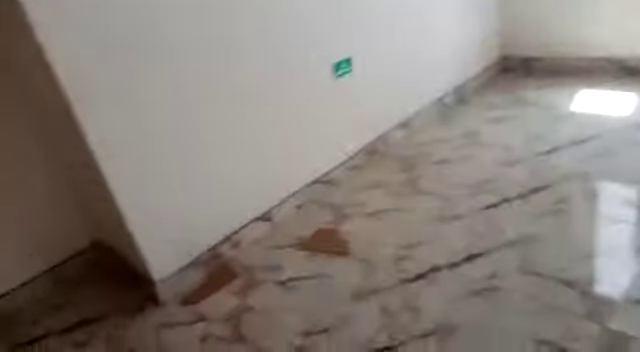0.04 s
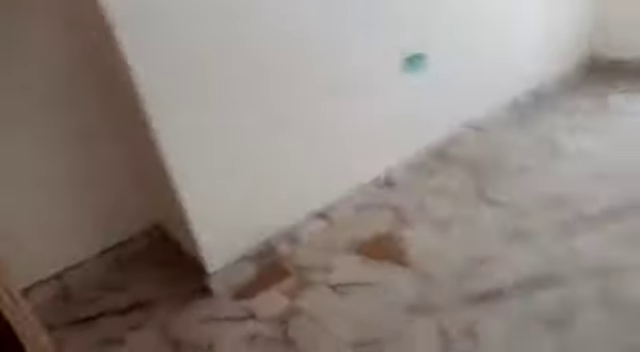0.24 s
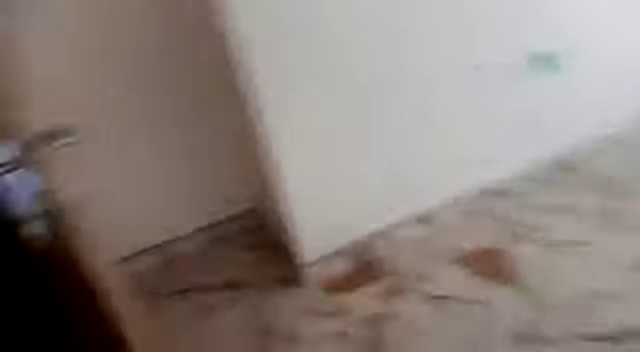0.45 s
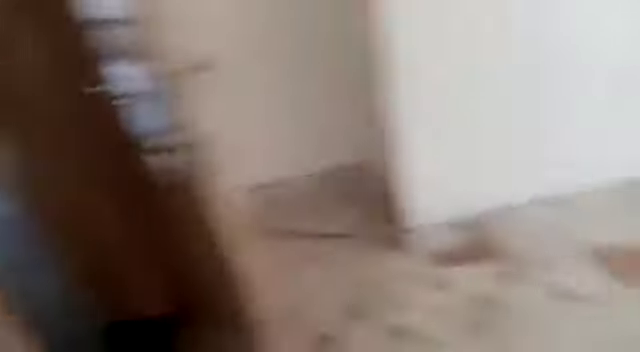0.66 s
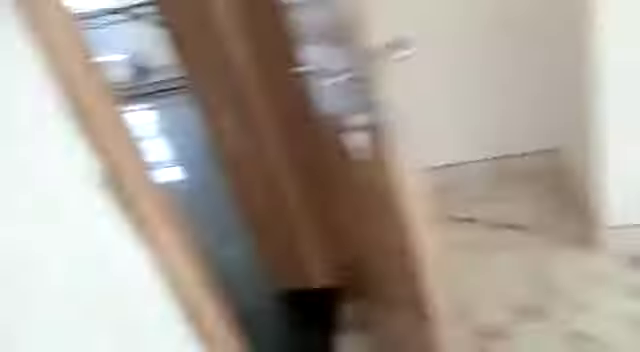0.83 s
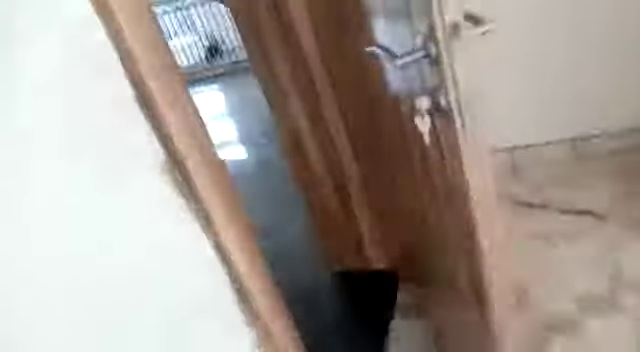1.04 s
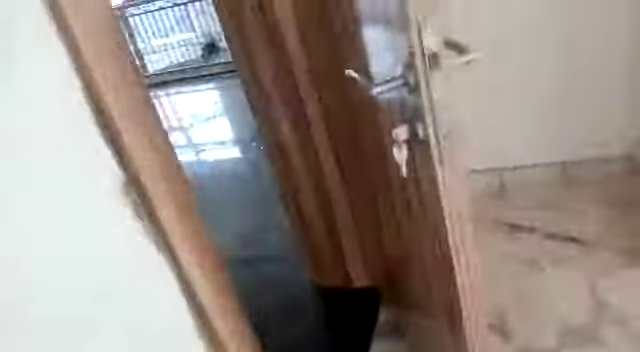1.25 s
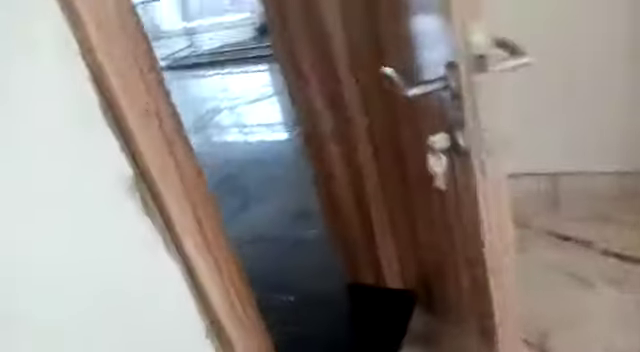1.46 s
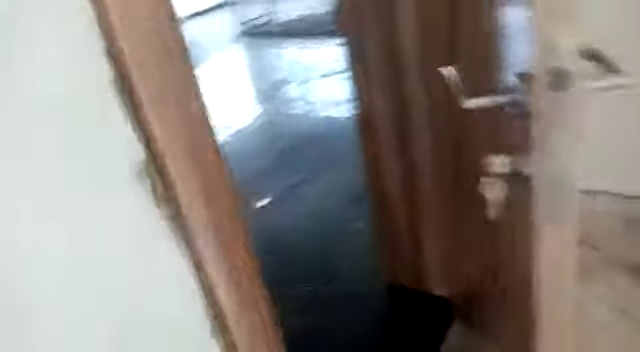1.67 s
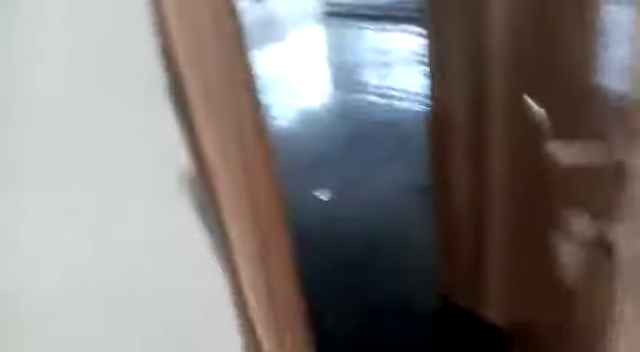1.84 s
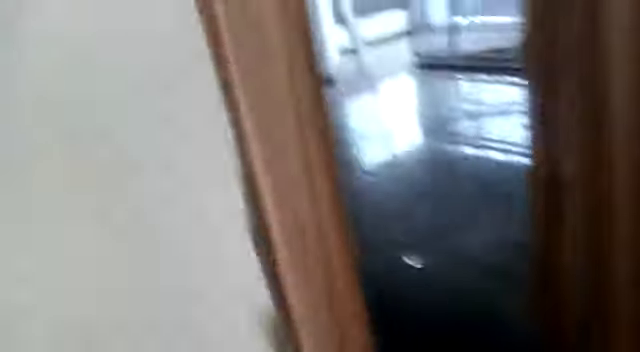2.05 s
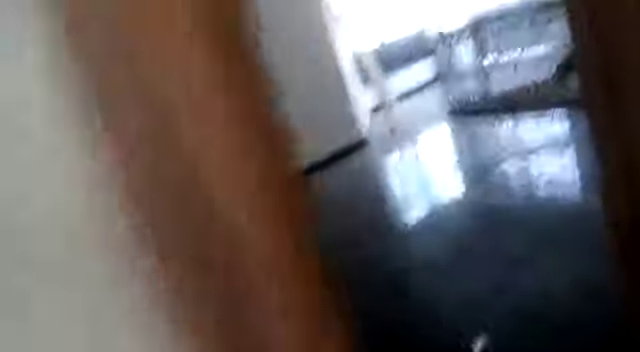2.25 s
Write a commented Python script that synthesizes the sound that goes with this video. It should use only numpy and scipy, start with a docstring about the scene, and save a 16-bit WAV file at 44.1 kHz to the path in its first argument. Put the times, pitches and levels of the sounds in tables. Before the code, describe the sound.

One loud bang from a wooden door forced open nearby fills an empty room with a long echo. Jingling keys, dull door knocks and clacks of the lock follow, then a single quiet footstep on the stone floor.

```python
"""Shoes shuffle softly, then a wooden door is forced open with a loud bang: a crack of air, the
ringing door leaf and the roar of a bare, stone-floored flat that echoes for seconds.
The door swings and thuds while a bunch of keys jingles in its lock.
Then the latch clacks as the handle is let go, and a footstep lands on the hard floor."""
import sys
import numpy as np
from scipy import signal
from scipy.io import wavfile
from scipy.ndimage import uniform_filter1d

SR = 44100
rng = np.random.default_rng(int(sys.argv[2]) if len(sys.argv) > 2 else 0)


def transcribe(signal):
    """Save signal, clipped to [-1, 1], as a 16-bit WAV file at the path in sys.argv[1]."""
    frames = np.atleast_2d(signal).T
    limited = np.clip(frames, -1, 1)
    pcm = np.round(limited * 32767).astype(np.int16)
    wavfile.write(sys.argv[1], SR, pcm)


N = 105840


def amp(db):
    """Decibels to gain."""
    return 10 ** (np.asarray(db) / 20)


def since(start_s):
    """Seconds since a moment, zero before it."""
    return np.maximum(np.arange(N) / SR - start_s, 0)


def curve(points):
    """Rows of (Hz, value) as a function of Hz, interpolated in log frequency."""
    points_hz, values = np.transpose(points)
    return lambda hz: np.interp(np.log(hz), np.log(points_hz), values)


def hump(centre_hz, half_width_oct, skirt_db=-48):
    """Bell-shaped spectrum, 3 dB down one half-width from its centre."""
    return lambda hz: np.maximum(-3 * (np.log2(hz / centre_hz) / half_width_oct) ** 2, skirt_db)


def noise_bands():
    """Narrow noise bands of unit rms: (centres in Hz, widths in Hz, signals)."""
    edges_hz = np.concatenate([np.geomspace(28, 7000, 25), np.arange(8000, 17001, 1000)])
    white = rng.standard_normal((3, 2 * N + SR // 4))
    bands = []
    for k in range(len(edges_hz) - 1):
        bandpass = signal.butter(3, edges_hz[k:k + 2], "band", fs=SR, output="sos")
        band = signal.sosfilt(bandpass, white[k % 3])[-2 * N:]
        bands.append(band / band.std())
    return np.sqrt(edges_hz[1:] * edges_hz[:-1]), np.diff(edges_hz), np.array(bands)


def band_gains(density_db, widths_hz):
    """Band gains for a spectral density, scaled to total power 1."""
    power = amp(density_db) ** 2 * widths_hz
    return np.sqrt(power / power.sum())


def ring(start_s, modes):
    """Damped modes struck together, each with random polarity."""
    t = since(start_s)
    return sum(rng.choice([-1, 1]) * amp(db - 60 * t / t60_s) * np.sin(2 * np.pi * hz * t)
               for hz, db, t60_s in modes)


def air_pulse(centre_s, half_s, top_hz):
    """One push and pull of air from a hard contact."""
    u = (np.arange(N) / SR - centre_s) / half_s
    return signal.sosfilt(signal.butter(4, top_hz, fs=SR, output="sos"), -2 * u * np.exp(-u * u))


# Each row: frequency in Hz, relative density in dB.
MURMUR_SPECTRUM = [(30, -42), (70, -28.5), (120, -9.5), (175, 1), (280, -14.5), (500, -15.5), (1200, -12),
                   (2500, -21), (5000, -26), (8000, -41), (12000, -56), (15500, -50.5)]

def building_murmur(noise):
    """The low, hollow background of the empty building."""
    centres_hz, widths_hz, bands = noise
    gains = band_gains(curve(MURMUR_SPECTRUM)(centres_hz), widths_hz)
    return amp(-59.5) * (gains @ bands[:, :N])


# Each row: frequency in Hz, reverberation time (T60) in seconds.
ROOM_T60 = [(60, 2.9), (150, 1.84), (400, 1.61), (1000, 1.73), (3000, 1.66), (6000, 1.31), (9000, 1.52),
            (12000, 0.74), (15000, 0.6)]

def room_impact(noise, start_s, spectrum, attack_s, direct_db, shudder_s=0):
    """A short direct burst, then dense echoes that build up, hold and die band by band."""
    contact_s, hold_s, grain_s = 0.0064, 0.044, 0.0018
    build_cycles = 0.66  # low notes take longer to fill the room
    shudder_share = 0.31  # a shuddering door slows the decay by this share
    centres_hz, widths_hz, bands = noise
    t = since(start_s)
    offset = rng.integers(N)
    direct = amp(direct_db) * np.exp(-t / contact_s) * (t > 0)
    decaying_s = np.maximum(t - hold_s, 0) - shudder_share * np.clip(t - hold_s, 0, shudder_s)
    grain_db = np.interp(since(0) / grain_s, np.arange(N), rng.standard_normal(N))
    gains = band_gains(spectrum(centres_hz), widths_hz)
    out = np.zeros(N)
    for hz, gain, band in zip(centres_hz, gains, bands[:, offset:offset + N]):
        build_up = 1 - np.exp(-t / (attack_s + build_cycles / hz))
        echoes = build_up * amp(-60 * decaying_s / curve(ROOM_T60)(hz))
        envelope = (direct + echoes) * amp(grain_db) if hz > 600 else echoes
        out += gain * band * envelope
    return out


def shoe_shuffle(noise):
    """A soft scuff of shoes, already echoing as the scene opens."""
    spectrum = hump(centre_hz=1500, half_width_oct=1.5)
    return amp(-62) * room_impact(noise, -0.04, spectrum, attack_s=0.0067, direct_db=-20)


# Each row: frequency in Hz, relative density in dB.
STEP_SPECTRUM = [(40, -21), (150, 2.5), (350, -6), (650, 5), (1100, -15), (3300, -13), (6000, -23),
                 (10000, -31.5), (15000, -40)]

def footstep(noise, start_s=2.3222):
    """A heel lands on stone and the room answers."""
    heel = amp(-50) * air_pulse(start_s + 0.0013, half_s=0.00073, top_hz=3500)
    impact = room_impact(noise, start_s, curve(STEP_SPECTRUM), attack_s=0.0034, direct_db=6.5)
    return heel + amp(-57.5) * impact


# One list per key. Each row: mode frequency in Hz, relative level in dB, T60 in seconds.
KEY_MODES = [
    [(6664, -11, .14), (7708, 0, .06), (7738, 0, .045)],
    [(12003, 0, .13)],
    [(11590, 0, .05)],
    [(14305, 0, .035), (14235, -3, .02), (14400, -7, .015), (15200, -1, .006)],
]
# Each row: start in seconds, then the relative level in dB of each of the four keys.
KEY_CLINKS = [(.451, -33, -25, -60, -26), (.478, -22, -27, -52, -22), (.505, -23.5, -33, -54, -31),
              (.582, -24, -59, -54, -15), (.656, -26.5, -57, -43, -22), (.705, -25, -55, -35, -42),
              (.768, -29.5, -63, -46, -25), (.811, -43, -47, -45, -28), (.955, -35, -62, -38, -23.5),
              (.999, -33, -57, -39, -33), (1.092, -32, -52, -36, -25), (1.125, -35.5, -59, -49, -30)]

def keys(attack_s=0.002, direct_db=-3, room_db=1):
    """Four keys knock together and ring on in the room."""
    out = np.zeros(N)
    for key, modes in enumerate(KEY_MODES):
        direct = np.zeros(N)
        for start_s, *levels_db in KEY_CLINKS:
            onset = 1 - np.exp(-since(start_s) / attack_s)
            direct += amp(levels_db[key]) * ring(start_s, modes) * onset
        room_t60_s = curve(ROOM_T60)(modes[0][0])
        tail = rng.standard_normal(N) * amp(-60 * since(0) / room_t60_s)
        echoes = signal.fftconvolve(direct, tail / np.linalg.norm(tail))[:N]
        out += amp(direct_db) * direct + amp(room_db) * echoes
    return out


# Each row: start in seconds, level in dB, centre in Hz, half-width in octaves,
# echo attack in seconds, direct burst in dB relative to the echoes.
LOCK_CLACKS = [(.056, -66, 5900, 0.39, 0.0045, 6), (0.767, -52, 9150, 0.18, .003, 13),
               (0.857, -38.5, 4640, 0.53, 0.0082, 3), (1.02, -46.5, 2690, 0.63, 0.0068, 15),
               (1.09, -46.5, 4450, 0.68, .008, 3), (1.088, -47, 14900, .07, .004, 11),
               (1.56, -77, 9900, .45, 0.0072, 0), (1.694, -53.5, 4500, 0.86, 0.0034, 6),
               (1.695, -64, 15500, 0.05, .003, 12), (1.722, -66, 5700, 0.28, .003, 13),
               (1.761, -69, 11000, .3, .003, 14)]

def lock_clacks(noise, damping_db_per_s=16):
    """Bright, brief contacts of lock and handle; being nearby, they die sooner than the room."""
    out = np.zeros(N)
    for start_s, level_db, centre_hz, half_width_oct, attack_s, direct_db in LOCK_CLACKS:
        clack = room_impact(noise, start_s, hump(centre_hz, half_width_oct), attack_s, direct_db)
        out += amp(level_db - damping_db_per_s * since(start_s)) * clack
    return out


# Each row: start in seconds, level in dB.
DOOR_THUDS = [(.74, -27), (.893, -44.5), (1.092, -36), (1.258, -41), (1.54, -49)]
# Each row: frequency in Hz, relative density in dB.
THUD_SPECTRUM = [(30, -23), (50, -7), (85, 0), (180, 1.5), (280, -6), (400, -6), (600, -17), (1200, -27.5),
                 (3000, -34), (8000, -60), (15000, -70)]

def door_thuds(noise, damping_db_per_s=29):
    """Dull knocks of the swinging door."""
    out = np.zeros(N)
    for start_s, level_db in DOOR_THUDS:
        thud = room_impact(noise, start_s, curve(THUD_SPECTRUM), attack_s=0.0037, direct_db=3)
        out += amp(level_db - damping_db_per_s * since(start_s)) * thud
    return out


# Each row: frequency in Hz, relative density in dB.
BANG_SPECTRUM = [(30, -25), (48, -29), (65, -7), (130, 1), (260, -1), (420, -11.5), (800, -11.5),
                 (1300, -17.5), (2000, -14), (3000, -9.5), (4500, -15), (7000, -18), (9000, -24.5),
                 (11000, -32.5), (13000, -38), (15300, -25.5)]
# Each row: mode frequency in Hz, relative level in dB, T60 in seconds.
DOOR_LEAF_MODES = [(63.5, -35, 3.2), (126.5, -27, 2.6), (153, -29, 1.5), (176, -29, 2.6), (227, -28, 2.4),
                   (273, -29, 2.2), (375, -38, 2.4)]

def door_bang(noise, start_s=0.2355, echo_delay_s=0.0055, leaf_attack_s=0.0023):
    """The door gives way: a crack, a slower shove of air, the room's roar and the ringing leaf."""
    crack = amp(-9) * air_pulse(start_s, half_s=0.00018, top_hz=4200)
    shove = amp(-20.5) * air_pulse(start_s + 0.0032, half_s=0.0016, top_hz=4200)
    roar = amp(-19.3) * room_impact(noise, start_s + echo_delay_s, curve(BANG_SPECTRUM),
                                    attack_s=0.0066, direct_db=-2, shudder_s=1)
    leaf_onset = 1 - np.exp(-since(start_s) / leaf_attack_s)
    leaf = amp(-1) * ring(start_s, DOOR_LEAF_MODES) * leaf_onset
    return crack + shove + roar + leaf


def scene():
    """Everything at one microphone beside the door."""
    noise = noise_bands()
    door = door_bang(noise) + door_thuds(noise) + lock_clacks(noise) + keys()
    feet = shoe_shuffle(noise) + footstep(noise)
    return (door + feet + building_murmur(noise))[None]


def record(dry):
    """Gain control turns loud sound down and recovers slowly; deep bass and top treble are cut."""
    threshold_db, reduction_share, excess_fall_db_per_s = -20.5, 0.2, 3
    low_cut_hz, high_cut_hz = 48, 15900
    level_db = 10 * np.log10(np.abs(uniform_filter1d(dry[0] ** 2, size=900)) + 1e-12)
    excess_db = np.maximum(level_db - threshold_db, 0)
    fall_db = excess_fall_db_per_s * since(0)
    held_excess_db = np.maximum.accumulate(excess_db + fall_db) - fall_db
    compressed = dry * amp(-reduction_share * held_excess_db)
    low_cut = signal.butter(6, low_cut_hz, "high", fs=SR, output="sos")
    high_cut = signal.ellip(12, 0.2, 70, high_cut_hz, fs=SR, output="sos")
    return signal.sosfilt(high_cut, signal.sosfilt(low_cut, compressed))


dry = scene()
out = record(dry)
transcribe(out)
```